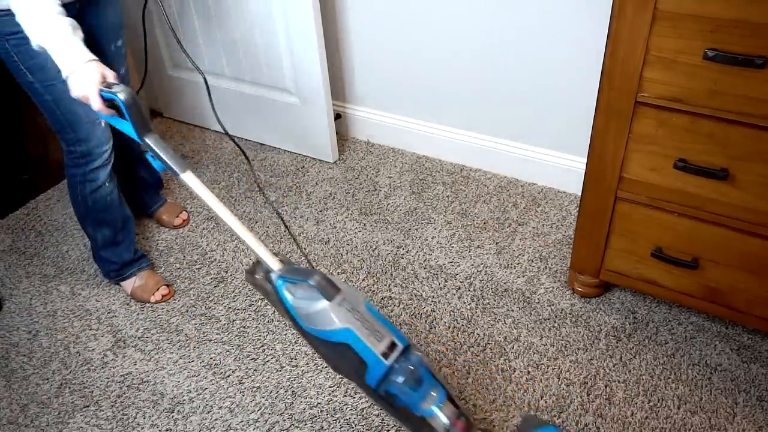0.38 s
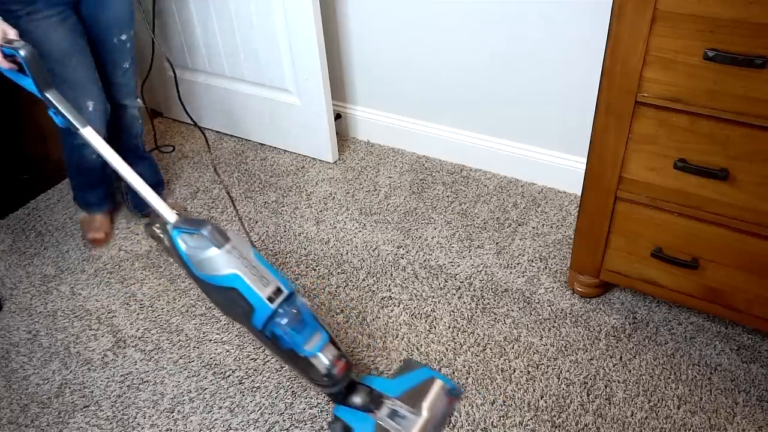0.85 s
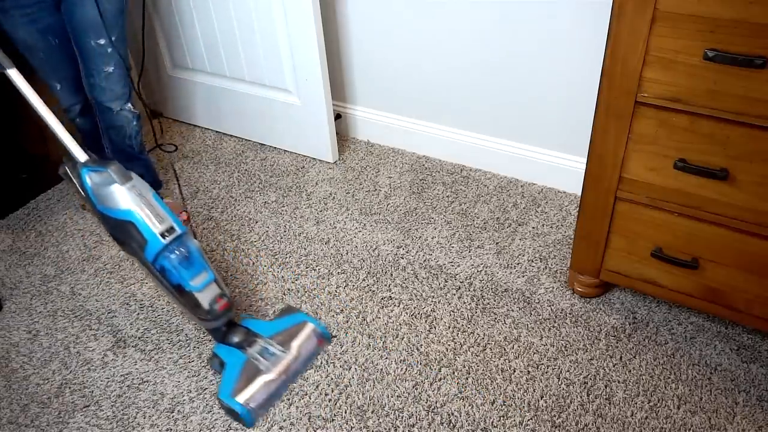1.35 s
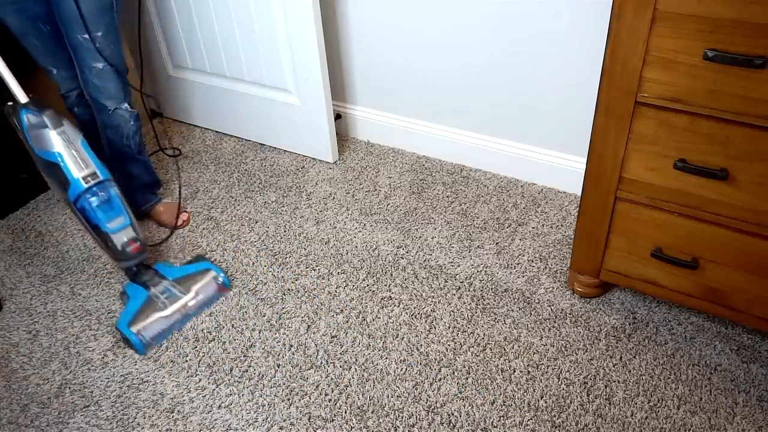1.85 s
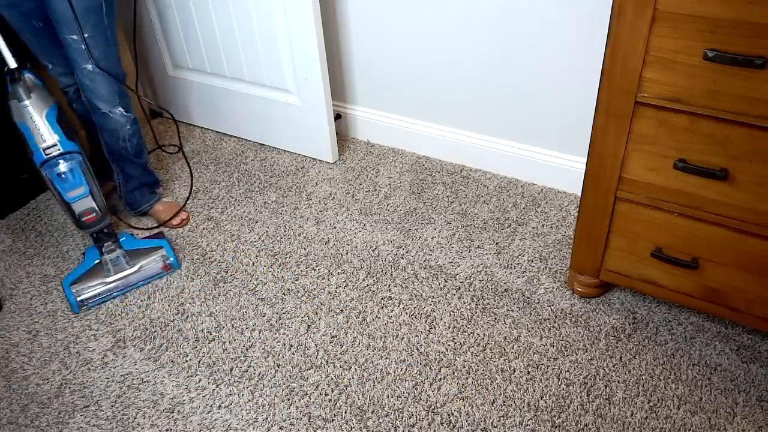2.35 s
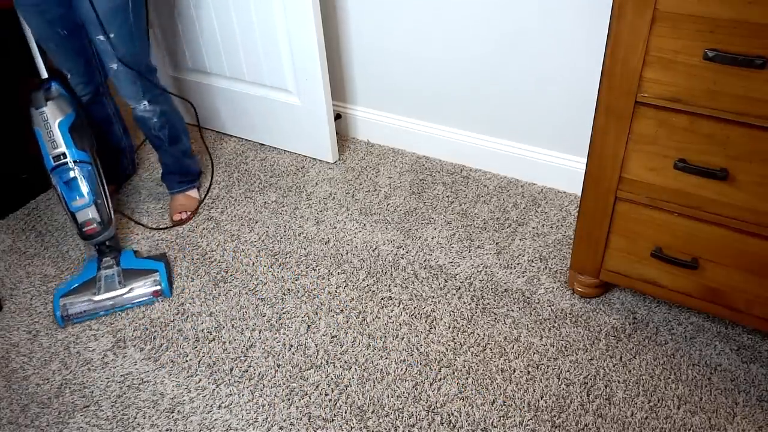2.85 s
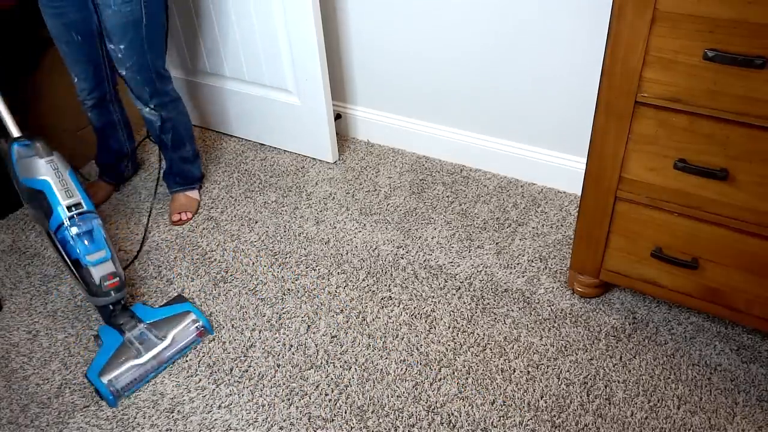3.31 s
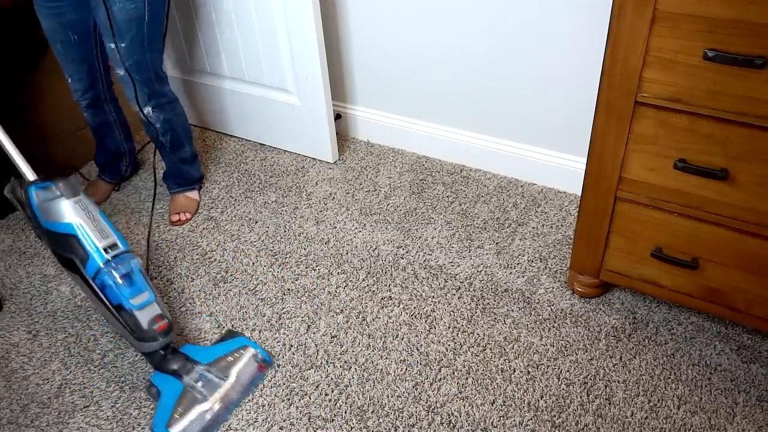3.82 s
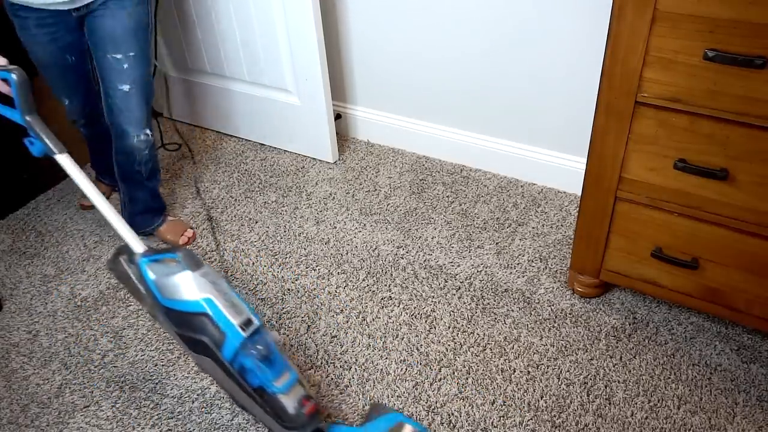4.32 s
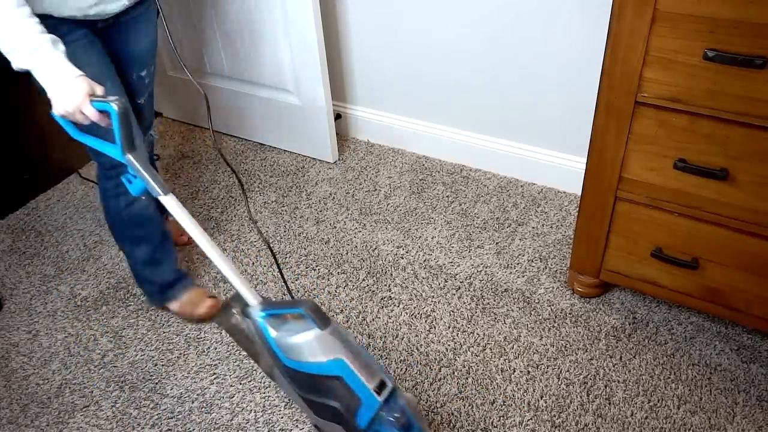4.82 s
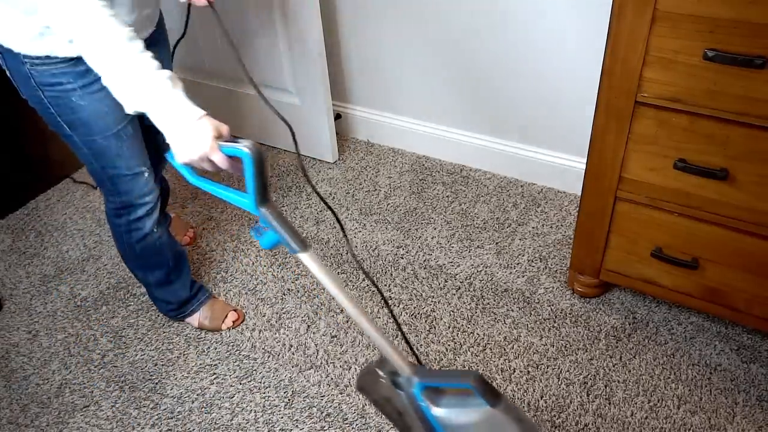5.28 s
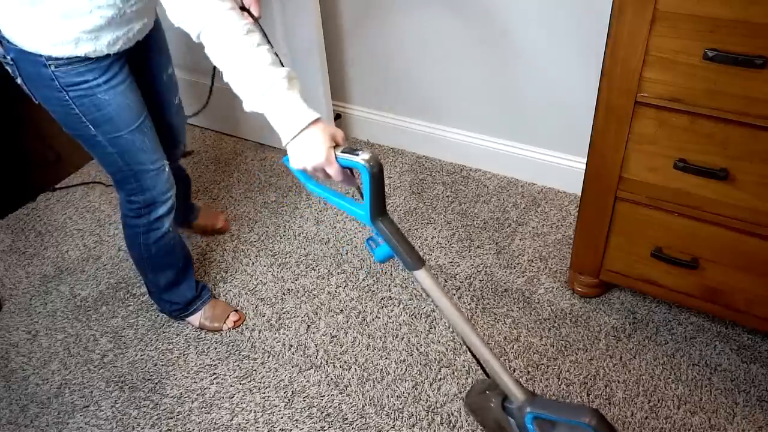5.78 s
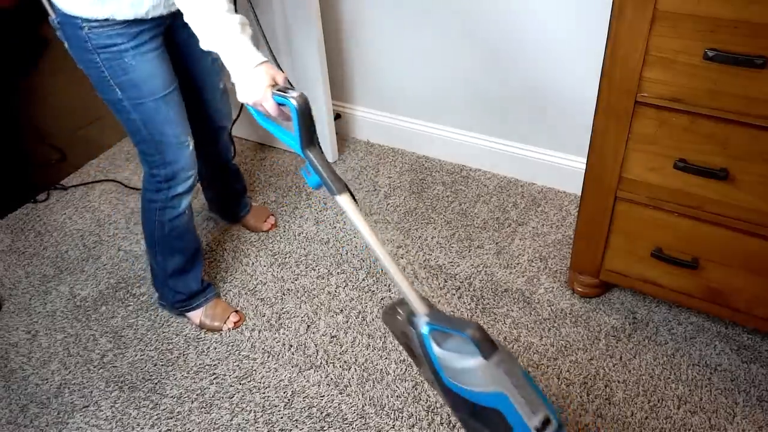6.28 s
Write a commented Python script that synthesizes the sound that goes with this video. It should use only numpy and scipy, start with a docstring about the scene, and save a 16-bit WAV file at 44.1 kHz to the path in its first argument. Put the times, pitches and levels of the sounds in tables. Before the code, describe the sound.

An upright vacuum cleaner is already at full speed and never stops. Broad, breathy air roar dominates, with a steady mid-pitched hum and a very high fan whistle that flutters, swelling most near the middle. The machine shifts from the right to the left and back again as it is pushed over carpet. Close stereo microphone in a furnished room with short wall reflections.

```python
"""Upright vacuum cleaner on carpet

Indoors, close to a two-port microphone: the machine runs at full speed, pushed to and fro.
The shaft hums, thirteen fan blades whistle and the brush motor whines: sines with wavering strength.
Air roars through the ducts: coloured noise, part straight from the machine, part from the walls.
The pure tones swell and fade in the room's pattern of reflections, differently at each port."""
import sys
import numpy as np
from scipy import signal
from scipy.fft import rfft, irfft
from scipy.io import wavfile
from scipy.ndimage import uniform_filter1d, map_coordinates

SR = 44100
rng = np.random.default_rng(int(sys.argv[2]) if len(sys.argv) > 2 else 0)


def log_audio(samples):
    """Write samples as a 16-bit WAV file to the path given in sys.argv[1]."""
    # one column per channel
    frames = np.atleast_2d(samples).T
    # limit to full scale, then quantise
    limited = np.clip(frames, -1, 1)
    pcm = np.round(limited * 32767).astype(np.int16)
    wavfile.write(sys.argv[1], SR, pcm)


def volts(x):
    """Linear amplitude factor 10**(x/20) for a level x in dB, scalar or array-like."""
    e = np.asarray(x, float) / 20
    return 10 ** e


N = 282240
BLADES = 13
FINE = 4  # oversampling for moving delays
SIDES = np.array([[1], [-1]])  # left port, right port


def columns(table):
    """Every column of a curve table after the time, one value a sample."""
    seconds, *rest = np.transpose(table)
    return [np.interp(np.arange(N) / SR, seconds, column) for column in rest]


def over_hz(points, hz):
    """Reads a table of values against frequency along a logarithmic axis."""
    hz_points, values = np.transpose(points)
    return np.interp(np.log(hz + 1), np.log(hz_points), values)


def walk(rate):
    """Random levels held 1 / rate s and slewed twice; spread near 1."""
    hold = int(SR / rate)
    steps = np.repeat(rng.standard_normal(N // hold + 1), hold)
    return 0.88 * uniform_filter1d(uniform_filter1d(steps, hold), hold)[:N]


def wavering(angle, rate):
    """A sine whose strength and phase wander: random amounts of sine and cosine."""
    return walk(rate) * np.sin(angle) + walk(rate) * np.cos(angle)


# Motor speed: t/s, shaft turns f/Hz
SHAFT_SPEED = [(0.0, 581.1), (0.5, 580.95), (1.2, 581.55), (2.4, 581.85), (3.15, 583.3), (3.6, 582.95),
               (4.1, 583.38), (5.7, 583.0), (6.4, 581.9)]


def shaft_angle():
    """The turning shaft: its speed summed into an angle in radians."""
    return 2 * np.pi * np.cumsum(columns(SHAFT_SPEED)[0]) / SR


# Where the machine stands as the ports hear it:
# t/s, left minus right level/dB (the tones take a part of it), left lags by t/microseconds
PORT_BEARING = [(0, -10.5, -20), (.9, 1.5, -13), (1.7, 6.5, -26), (2.5, 6.5, -47), (3.3, 5, -32),
                (4.3, 2.5, -24), (4.9, -4, -21), (5.3, -8, 24), (5.8, -11.5, 51), (6.4, -8, 33)]


def tone(level_table, multiple, turn, lean, apart_db, fade_hz, scatter, scatter_hz):
    """A shaft order, offset in time and level between ports; scattered and reflected parts make it flutter."""
    pan_db, lag_us = columns(PORT_BEARING)
    lag_angle = np.gradient(turn) * SR * lag_us / 10 ** 6 / 2
    angles = multiple * (turn - SIDES * lag_angle)
    flutter = np.array([np.sin(angle) + scatter * wavering(angle, scatter_hz) for angle in angles])
    level_db = columns(level_table)[0] + SIDES * lean * pan_db / 2
    straight = np.sqrt(2) * volts(level_db) * flutter
    # the reflected part is opposite at the two ports
    reflected = wavering(multiple * turn, fade_hz)
    return straight + SIDES * volts(apart_db) * reflected


# Shaft hum, before flutter and port differences: t/s, level/dB
HUM_LEVEL = [(0.0, -32), (0.1, -25), (0.94, -23), (1.1, -30), (1.14, -40), (1.23, -23), (1.51, -16),
             (1.87, -31), (2.08, -20.5), (3.24, -30), (3.76, -29), (3.9, -21.5), (4.04, -21), (4.22, -35.5),
             (4.26, -26), (4.53, -20.5), (4.74, -28), (4.97, -20.5), (5.7, -26), (5.86, -22), (6.31, -25),
             (6.4, -32)]


def hum(turn):
    """The shaft itself: one cycle a turn."""
    return tone(HUM_LEVEL, 1, turn, lean=0.31, apart_db=-32, fade_hz=4, scatter=0.034, scatter_hz=15)


# Blade whistle, before flutter and port differences: t/s, level/dB
WHISTLE_LEVEL = [(0, -27.5), (.5, -20), (.66, -35), (.78, -16), (.98, -25), (1.27, -15.5), (1.43, -29),
                 (1.7, -16), (2.15, -17), (2.38, -26.5), (2.56, -8.5), (2.72, -19), (2.9, -10.5),
                 (3.08, -21), (3.6, -17.5), (3.71, -22), (3.85, -18), (4.6, -17.5), (4.88, -21.5),
                 (5.0, -17), (5.25, -25), (5.85, -21), (6.25, -22.5), (6.36, -16.5)]


def whistle(turn):
    """The fan: one cycle for each blade that passes."""
    return tone(WHISTLE_LEVEL, BLADES, turn, lean=0.41, apart_db=-21.5, fade_hz=21.97,
                scatter=0.59, scatter_hz=22)


# The whistle's octave, before flutter and port differences: t/s, level/dB
OCTAVE_LEVEL = [(0, -31), (.5, -28), (1.2, -29.5), (2.4, -28), (2.7, -34), (3.5, -25), (4.3, -30),
                (5.3, -32), (6.4, -36)]


def octave(turn):
    """The second harmonic of the blade whistle."""
    return tone(OCTAVE_LEVEL, 2 * BLADES, turn, lean=0.88, apart_db=-32, fade_hz=18,
                scatter=0.9, scatter_hz=45)


# Seventh shaft order, before flutter and port differences: t/s, level/dB
SEVENTH_LEVEL = [(0, -36), (.2, -33), (.45, -38), (.65, -29), (.95, -33), (1.38, -32), (1.55, -39),
                 (1.95, -43), (2.2, -30), (2.95, -35.5), (3.15, -42), (3.33, -28.5), (3.75, -39),
                 (4.08, -28.5), (4.3, -31.5), (4.45, -40), (5.2, -35), (5.7, -33), (5.85, -41), (6.2, -36)]


def seventh(turn):
    """A tone at seven cycles a turn of the shaft."""
    return tone(SEVENTH_LEVEL, 7, turn, lean=0.15, apart_db=-48, fade_hz=12, scatter=0.66, scatter_hz=30)


# Weaker shaft orders: cycles per turn, level/dB, rate of random fading f/Hz
FAINT_ORDERS = [(2, -32.5, 9), (12, -32, 26), (14, -32.5, 21)]


def weak_orders(turn):
    """Faint orders that fade in and out on their own at each port."""
    out = np.zeros((2, N))
    for multiple, db, rate in FAINT_ORDERS:
        for port in out:
            port += volts(db) * wavering(multiple * turn, rate)
    return out


# The brush motor's whine, slower under load: t/s, f/Hz, level/dB of the part common to both ports
BRUSH_WHINE = [(0, 1110, -26), (.6, 1092, -33), (1.3, 1050, -25), (1.7, 995, -28), (2.3, 1026, -29.5),
               (3.3, 1031, -31), (4.1, 1040, -32), (4.8, 1023, -31), (5.4, 1015, -31), (6.4, 1055, -42)]


def brush(width_hz=24, in_step=0.78):
    """A rough whine: a gliding tone whose strength and phase waver quickly."""
    hz, db = columns(BRUSH_WHINE)
    angle = 2 * np.pi * np.cumsum(hz) / SR
    mid = wavering(angle, width_hz)
    side = wavering(angle, width_hz) * np.sqrt(1 - in_step)
    return volts(db) * np.array([mid + side, mid - side])


def delayed(fine, seconds):
    """Reads an oversampled sound at a moving delay."""
    position = FINE * (np.arange(N) - seconds * SR) % len(fine)
    return map_coordinates(fine, [position], order=1, mode="wrap")


PORT_GAP_M, SOUND_M_S = 0.048, 343


def walls(spectrum, stroke_m, count=20, first_m=1.2, last_m=26, fade_db_per_m=0.1):
    """Echoes from all sides; their paths change as the machine moves, so the spectrum's peaks drift."""
    fine = FINE * irfft(spectrum, FINE * N)
    path_m = np.linspace(first_m, last_m, count)
    gains = volts(-fade_db_per_m * path_m)
    out = np.zeros((2, N))
    for metres, gain, (spread, along, bearing) in zip(path_m, gains, rng.uniform(-1, 1, (count, 3))):
        way_m = metres + 0.6 * spread + along * stroke_m
        for port, sign in zip(out, (1, -1)):
            port += gain * delayed(fine, (way_m + sign * bearing * PORT_GAP_M / 2) / SOUND_M_S)
    return out / np.sqrt(np.sum(gains ** 2))


# Air rush, before flicker and the tilts of the stroke: t/s, level/dB
FLOW_LEVEL = [(0, -15.5), (.7, -13), (1.5, -14.5), (2.44, -16.5), (2.74, -14.5), (3.05, -15.5), (3.66, -14),
              (4.6, -14.5), (5.3, -14), (5.8, -17), (6.4, -15.5)]
# How far the machine is pushed towards the microphone, before a random sway: t/s, distance/m
STROKE_DISTANCE = [(0, 1.04), (.8, 0.68), (2.8, 0), (3.2, 0.088), (5.4, 1.15), (6.4, 1.1)]
# Relative colour of the rush at the microphone, before ducts and top loss: f/Hz, level/dB per Hz
RUSH_COLOUR = [(30, -58), (100, -37), (200, -22.5), (320, -9.5), (450, -3), (800, -2.5), (1400, -1),
               (2100, -1.5), (3800, -5), (5300, -10), (8500, -10.5), (13000, -8)]
# The microphone loses the very top: f/Hz, level/dB
MIC_TOP_LOSS = [(13000, 0), (15150, -2.5), (15300, -19)]
# Duct resonances: f/Hz, width f/Hz, lift at the peak level/dB
DUCT_RESONANCES = [(1050, 220, 3), (1796, 55, 3), (2880, 840, 3.5), (7000, 3700, 8.5), (10730, 590, 4)]
# Share of the rush's power that comes from the walls: f/Hz, share/0-1
WALL_POWER_SHARE = [(200, 0.85), (2000, 0.59), (12000, 0.71)]


def rush(flicker_db=1.58, flicker_hz=7, bass_hz=560, treble_hz=4100, outlet_hz=2700,
         outlet_db_per_m=1.5, sway_m=0.066, shadow_hz=700):
    """Broad air noise, mostly in half-octave bands, each with its own slow flicker; straight and off walls."""
    pan_db, lag_us = columns(PORT_BEARING)
    stroke_m = columns(STROKE_DISTANCE)[0] + sway_m * walk(3)
    # pushed closer, the rush gains bass and loses treble
    bass_db = -0.47 + 2.5 * stroke_m
    treble_db = -0.7 - 0.9 * stroke_m
    hz = np.fft.rfftfreq(N, 1 / SR)
    lift_db = sum(db / (1 + (2 * (hz - f) / width) ** 2) for f, width, db in DUCT_RESONANCES)
    colour = volts(over_hz(RUSH_COLOUR, hz) + over_hz(MIC_TOP_LOSS, hz) + lift_db)
    noise = rfft(rng.standard_normal(N)) * colour / np.sqrt(np.mean(colour ** 2))
    air = np.zeros(N)
    edges = np.r_[0, 140 * 2 ** np.arange(0, 7, 0.5), SR / 2]
    for lo, hi in zip(edges, edges[1:]):
        tilt_db = 0
        if hi <= bass_hz + 1:
            tilt_db = bass_db
        elif lo >= treble_hz:
            tilt_db = treble_db
        elif hi > outlet_hz:
            # the air outlet is heard more plainly from close by
            tilt_db = outlet_db_per_m * (stroke_m - 0.5)
        band = irfft(noise * ((hz >= lo) & (hz < hi)), N)
        air += volts(tilt_db + flicker_db * walk(flicker_hz)) * band
    spectrum = rfft(air * volts(columns(FLOW_LEVEL)[0]))
    share = over_hz(WALL_POWER_SHARE, hz)
    # the straight sound reaches one port a little before the other
    fine = FINE * irfft(spectrum * np.sqrt(1 - share), FINE * N)
    straight = np.array([delayed(fine, sign * lag_us / 10 ** 6 / 2) for sign in (1, -1)])
    # the housing shades the far port only from short waves
    treble = signal.sosfilt(signal.butter(1, shadow_hz, "high", fs=SR, output="sos"), straight)
    shaded = straight + (volts(SIDES * pan_db / 2) - 1) * treble
    return shaded + walls(spectrum * np.sqrt(share), stroke_m)


def scene():
    """The whole machine: tones locked to one shaft, the brush motor and the air."""
    turn = shaft_angle()
    tones = hum(turn) + whistle(turn) + octave(turn) + seventh(turn) + weak_orders(turn)
    # nozzle and exhaust roar independently, each with its own echoes
    air = (rush() + rush()) / np.sqrt(2)
    return tones + brush() + air


def roll_off(x):
    """The treble ends steeply here."""
    return signal.sosfilt(signal.butter(12, 16690, fs=SR, output="sos"), x)


def record(dry):
    """A faint low rumble of the microphone itself, the highest peaks clipped, the top cut off."""
    low_pass = signal.butter(2, 90, fs=SR, output="sos")
    rumble = signal.sosfilt(low_pass, rng.standard_normal((3, N)))
    rumble = rumble[0] + 0.2 * rumble[1:]  # mostly common to both ports
    rumble *= volts(-79) / rumble.std()
    clipped = np.clip(dry + rumble, -1, 1)
    steep = signal.ellip(12, 0.2, 75, 15720, fs=SR, output="sos")
    mix = signal.sosfilt(steep, clipped)
    return roll_off(mix)


dry = scene()
out = record(dry)
log_audio(out)
```